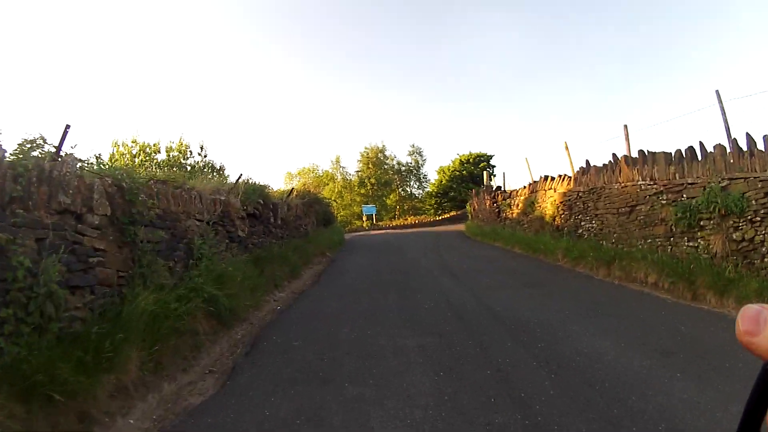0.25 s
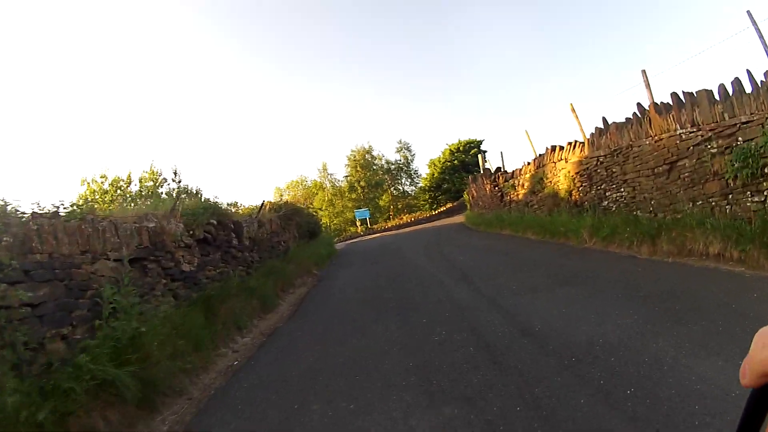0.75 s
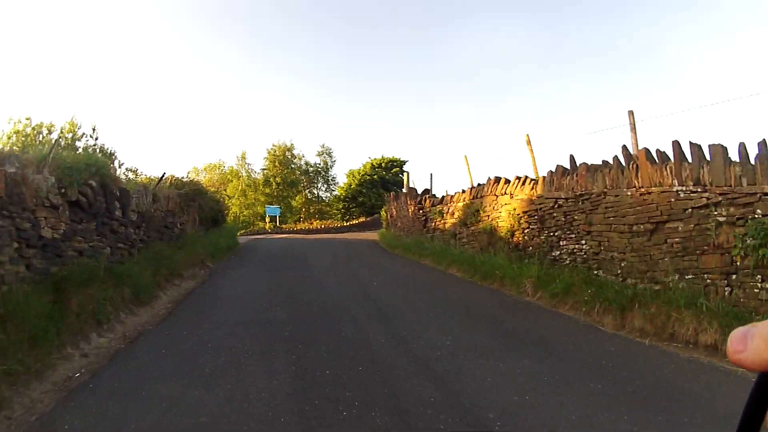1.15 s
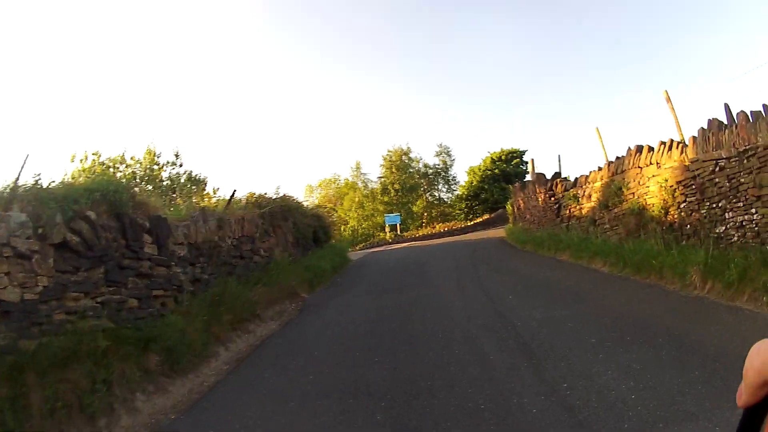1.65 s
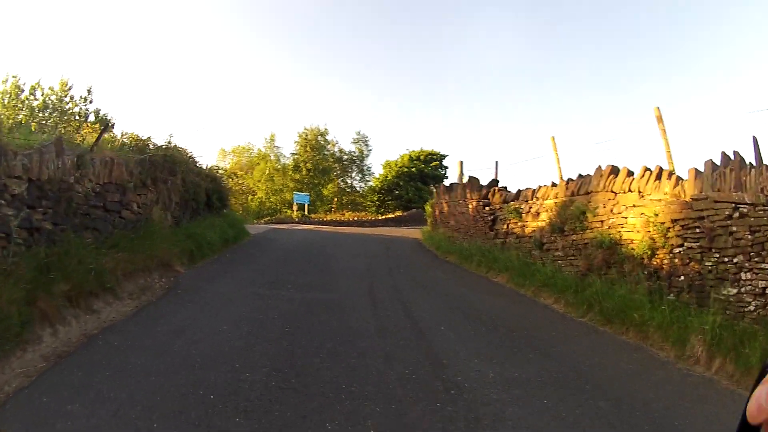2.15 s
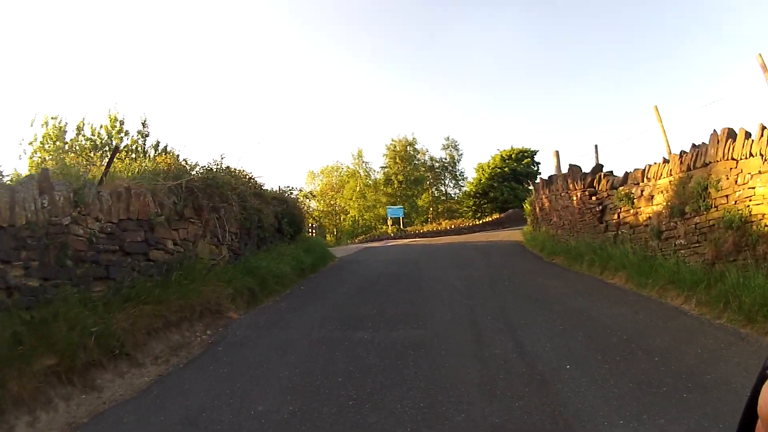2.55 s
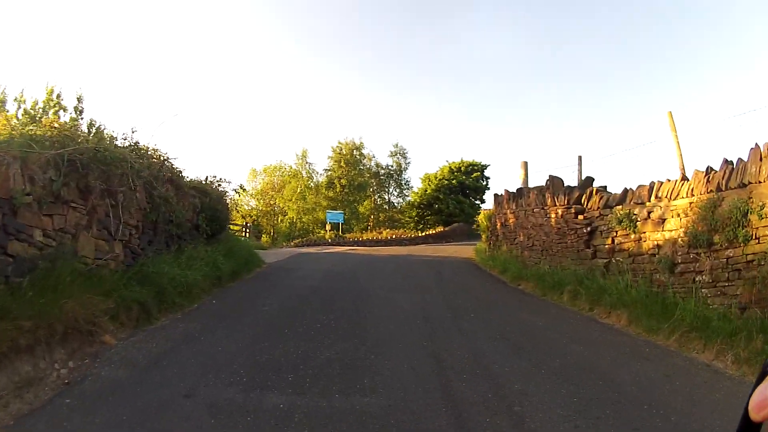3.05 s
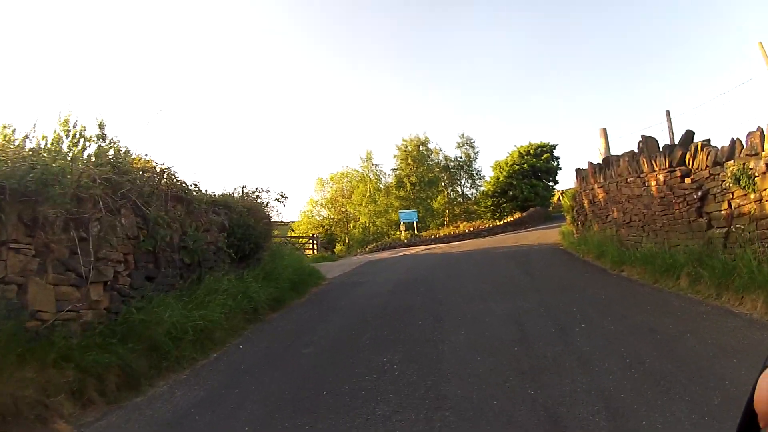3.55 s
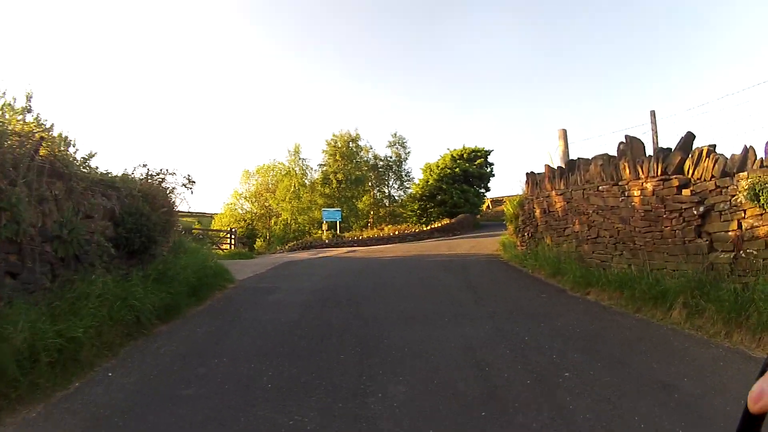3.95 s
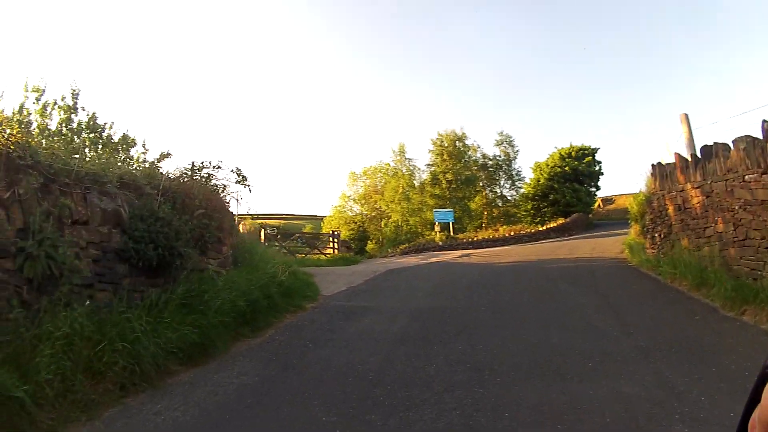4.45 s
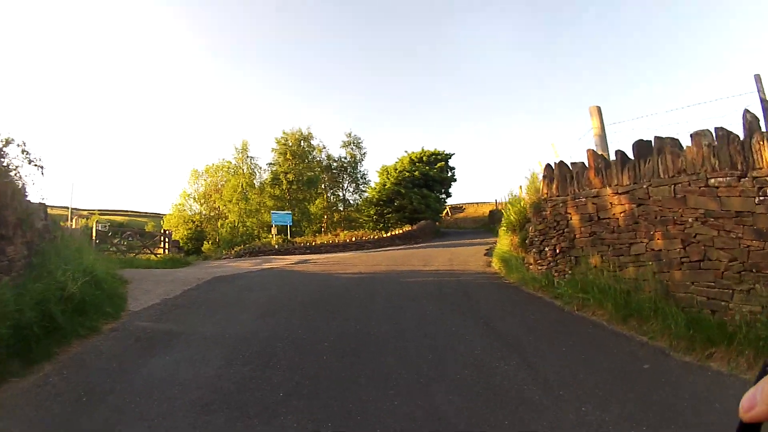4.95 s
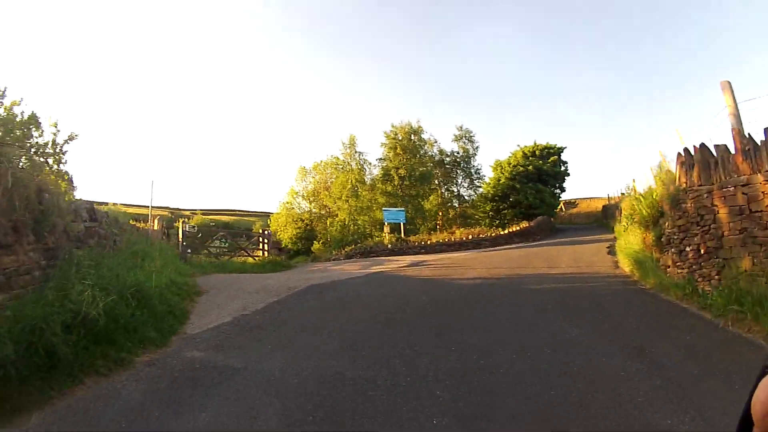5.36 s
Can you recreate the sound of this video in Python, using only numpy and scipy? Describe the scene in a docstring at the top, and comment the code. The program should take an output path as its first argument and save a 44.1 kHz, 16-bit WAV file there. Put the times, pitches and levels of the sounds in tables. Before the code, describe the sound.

Low pulsing road rumble and wind buffeting from a pedalled bicycle, heard at the handlebar, with dull thumps and small irregular rattly clicks.

```python
"""On a tarmac lane, uphill: a bicycle is pedalled, heard from a camera clamped to the handlebar.
Road grain shakes frame, bar and tread as filtered noise that surges with each pedal stroke; lumps ring the frame.
Shaped low noise is wind buffeting the camera case; random taps and single blows make the mount chatter and tick.
Grit snaps as short scraping blows; noise gripped unevenly makes the clamp creak and squeak and the brake pad
brush the rim. A faint hiss lies under it all."""
import sys
import numpy as np
from scipy import signal
from scipy.fft import rfft, irfft, next_fast_len
from scipy.io import wavfile
from scipy.ndimage import uniform_filter1d, map_coordinates

SR = 44100
rng = np.random.default_rng(int(sys.argv[2]) if len(sys.argv) > 2 else 0)


def master(y):
    """Save y as 16-bit WAV."""
    cut = np.clip(np.atleast_2d(y).T, -1, 1)
    pcm = np.round(cut * 32767)  # scale
    wavfile.write(sys.argv[1], SR, pcm.astype(np.int16))


N = 246519

# In every table of modes f is the rest pitch, width that of one resonance pass, level the relative strength.
# modes of frame and fork, the two deep ones first: (f/Hz, width/Hz, level/dB)
FRAME_MODES = [(147.2, 56, -1.5), (178.5, 33, 0.7), (235.2, 48, 0.4), (274.9, 30.3, -1.3),
               (342.7, 50.7, -1.5), (437, 148, -15), (533.6, 54, -16)]
# modes of the handlebar: (f/Hz, width/Hz, level/dB)
BAR_MODES = [(103.1, 20.5, 2), (83, 22, -10.5)]
# modes of the camera case, right at the microphone: (f/Hz, width/Hz, level/dB)
CASE_MODES = [(1640, 800, -17.5), (2573, 347, -3), (2877, 216, 3.5), (3088, 564, -4.5), (3537, 310, -13),
              (4218, 380, -16), (5400, 1700, -26)]
# modes of the mount's dull knock: (f/Hz, width/Hz, level/dB)
MOUNT_MODES = [(960, 340, 7), (1540, 880, -3), (2004, 235, 0)]


def amp(db):
    """Decibels to gain."""
    return 10 ** (np.asarray(db) / 20)


def unit(x):
    """Scale to rms 1."""
    return x / np.sqrt(np.mean(x ** 2) + 1e-20)


def wobble(rate):
    """A smooth random curve, rate knots a second."""
    knots = rng.standard_normal(int(N * rate / SR) + 4)
    return map_coordinates(knots, [np.arange(N) * rate / SR])


def filtered(x, response):
    """x times a complex response of frequency."""
    m = next_fast_len(len(x) + SR // 10)
    return irfft(rfft(x, m) * response(np.fft.rfftfreq(m, 1 / SR)), m)[:len(x)]


def coloured(spectrum):
    """Noise of rms 1 shaped by (f/Hz, level/dB) rows."""
    hz, db = np.transpose(spectrum)
    shape = lambda f: amp(np.interp(np.log(f + 1), np.log(hz), db))
    return unit(filtered(rng.standard_normal(N), shape))


def resonance(f, hz, width, order=2):
    """A resonance applied order times: soft onset, steep skirts."""
    return (1j * f * width / (hz * hz - f * f + 1j * f * width)) ** order


def ring(force, modes, spot_db=0.0, order=3):
    """Every contact lands on a new spot, so it drives each mode with a new strength and sign."""
    total = 0
    for hz, width, db in modes:
        sign = rng.choice([-1, 1], len(force))
        spot = sign * amp(spot_db * rng.standard_normal(len(force)))
        total = total + amp(db) * filtered(force * spot, lambda f: resonance(f, hz, width, order=order))
    return total


def shaken(modes, grip=1):
    """Each mode is driven by its own random force, scaled by grip; rms 1."""
    total = 0
    for hz, width, db in modes:
        force = grip * rng.standard_normal(N)
        total = total + amp(db) * filtered(force, lambda f: resonance(f, hz, width))
    return unit(total)


def restless(modes, drift, patchy_db, rate):
    """Shaken modes that each drift in pitch (a share) and strength as the load shifts, rate knots a second; rms 1."""
    total = 0
    for hz, width, db in modes:
        strength = amp(db + patchy_db * wobble(rate)) * np.sqrt(width)
        clock = np.arange(N) + np.cumsum(drift * wobble(rate))
        mode = shaken([(hz, width, db)])
        total = total + strength * map_coordinates(mode, [clock], order=1, mode="mirror")
    return unit(total)


def steadied(x, seconds):
    """Even out swells slower than the given time; rms 1."""
    power = uniform_filter1d(x ** 2, max(int(seconds * SR), 1))
    return unit(x / np.sqrt(np.abs(power) + 0.034))


def contact(modes, length, scrape, damping=1, detune=0.014, spot_db=1.0):
    """A blow and a scrape, down 60 dB after length s, ring a slightly detuned body; damping widens modes; peak 1."""
    t = np.arange(SR // 20) / SR
    force = scrape * rng.standard_normal(len(t)) * amp(-60 * t / length)
    force[0] += 1
    pitch = 1 + detune * rng.standard_normal()
    body = [(pitch * hz, damping * width, db) for hz, width, db in modes]
    sound = ring(force, body, spot_db=spot_db)
    return sound / np.abs(sound).max()


def add(track, s, sound):
    """Mix a sound into a track at time s."""
    part = track[max(round(s * SR), 0):][:len(sound)]
    part += sound[:len(part)]


def swells(rows):
    """Bell-shaped gains from (middle t/s, length/s, level/dB) rows."""
    t = np.arange(N) / SR
    return sum(amp(db) * np.exp(-(2 * (t - s) / length) ** 2) for s, length, db in rows)


def hiss():
    """The microphone's own faint hiss: steady noise that falls towards the treble."""
    # shape of the hiss: (f/Hz, relative density/dB)
    hiss_shape = [(500, 5.5), (5000, -3.5), (7500, -6.5), (12000, -7.5), (15000, -10)]
    return amp(-72.5) * coloured(hiss_shape)


def wind(rumble_gain):
    """Eddies push on the camera case, harder as it swings into each stroke and in gusts."""
    # shape of the buffeting: (f/Hz, relative density/dB)
    buffet_shape = [(10, -14), (25, -19), (40, -9.5), (55, -2.5), (70, -4.5), (100, -7), (200, -35.5),
                    (600, -70.5), (2000, -120)]
    # stronger gusts: (middle t/s, length/s, level/dB added to the buffeting)
    gust_rows = [(0.39, 0.04, -48), (1.18, 0.038, -41), (1.49, 0.07, -45), (3.11, 0.037, -38),
                 (4.05, 0.1, -40)]
    base_db, follows, lead_s = -42, 0.59, 0.019  # follows: dB gained per dB of rumble; lead_s: runs ahead
    t = np.arange(N) / SR
    swing = np.interp(t + lead_s, t, rumble_gain / rumble_gain.mean())
    gain = amp(base_db) * swing ** follows + swells(gust_rows)
    return gain * steadied(coloured(buffet_shape), seconds=0.15)


def friction(squeak_width_hz=260):
    """Surfaces that stick and let go: the clamp creaks and squeaks, the brake pad swishes on the rim."""
    # creaks of the clamp: (middle t/s, length/s, level/dB)
    creak_rows = [(0.035, 0.028, -51.5), (0.083, 0.011, -49)]
    # squeaks of the clamp: (middle t/s, length/s, level/dB, f/Hz)
    squeak_rows = [(0.301, 0.01, -54.5, 4080), (0.317, 0.047, -52, 2920), (0.329, 0.012, -64, 4240)]
    # the brake pad brushes the rim: (middle t/s, length/s, level/dB)
    rub_rows = [(0.82, 0.13, -80), (1.28, 0.21, -76.5), (3.12, 0.15, -77), (4.335, 0.038, -70.5)]
    # modes of the clamp: (f/Hz, width/Hz, level/dB)
    clamp_modes = [(3060, 790, 6), (4260, 420, 1), (5260, 1600, -13.5)]
    # mode of the rim: (f/Hz, width/Hz, level/dB)
    rim_modes = [(5380, 1300, 0)]
    slips = amp(2.3 * wobble(400))
    creaks = swells(creak_rows) * steadied(shaken(clamp_modes, grip=slips), seconds=0.047)
    squeaks = 0
    for *row, hz in squeak_rows:
        tone = steadied(shaken([(hz, squeak_width_hz, 0)], grip=slips), seconds=0.025)
        squeaks = squeaks + swells([row]) * tone
    swishes = swells(rub_rows) * shaken(rim_modes, grip=slips)
    return creaks + squeaks + swishes


def grit():
    """Small stones flung by the tyre snap and scrape against the bicycle; each also jolts the case."""
    # stones: (t/s, snap peak level/dB, scrape length/s, case ring peak level/dB, damping: factor on snap widths)
    stone_rows = [(0.349, -52, .004, -43, 1.6), (1.1713, -29.5, 0.001, -51, 0.98),
                  (3.8403, -49, 0.0058, -41, 1.6), (4.081, -52, 0.006, -47, 2),
                  (4.386, -46, 0.0065, -47, 2.1)]
    # modes that a stone rings: (f/Hz, width/Hz, level/dB)
    snap_modes = [(1390, 740, -1), (2280, 1400, 5), (2780, 1300, 7.5), (4300, 1000, -8), (5160, 1200, 7.5),
                  (6200, 800, -8), (8350, 3000, -17)]
    track = np.zeros(N)
    for s, db, length, jolt_db, damping in stone_rows:
        snap = contact(snap_modes, length, scrape=0.19, damping=damping, detune=0.004, spot_db=2.0)
        add(track, s, amp(db) * snap)
        add(track, s, amp(jolt_db) * contact(CASE_MODES, length, scrape=0.42))
    return track


def ticks(ring_db=2.5, focus_hz=2850, focus_width_hz=1900, focus_scatter=0.05):
    """Harder jolts knock the mount against its clamp: a case ring of varying pitch over a duller knock."""
    # knocks: (t/s, case ring level/dB before ring_db and the focus filter, dull knock peak level/dB)
    tick_rows = [(0.2207, -53, -45), (0.443, -40, -57), (0.4637, -43, -54), (0.499, -42.5, -44),
                 (0.704, -45.5, -44), (0.7247, -38, -56), (0.754, -41, -53), (0.849, -56, -39),
                 (0.9772, -41.5, -43), (1.048, -47.5, -51), (1.1, -47.5, -51), (1.121, -62, -43.5),
                 (1.18, -55, -57), (1.233, -47, -54), (1.295, -48.5, -48), (1.359, -48, -50),
                 (1.379, -41, -52), (1.389, -43.5, -56), (1.395, -37.5, -52), (1.562, -46, -49),
                 (1.6221, -41, -41.5), (1.673, -48, -48), (1.8795, -45.5, -42), (1.905, -45, -54),
                 (1.9182, -45, -45), (1.927, -42, -50), (2.1, -46, -63), (2.277, -47, -52),
                 (2.322, -48.5, -45), (2.5366, -43, -48), (2.5937, -42.5, -43), (2.622, -44.5, -53),
                 (2.87, -47.5, -46), (2.937, -46, -44.5), (3.0485, -44.5, -47), (3.238, -44.5, -55),
                 (3.4613, -49, -45), (3.479, -37.5, -45), (3.4856, -46.5, -46), (3.553, -41, -62),
                 (3.592, -45.5, -62), (3.788, -43, -44), (3.9125, -46, -47.5), (4.0055, -39, -44),
                 (4.028, -47, -54), (4.202, -46, -44), (4.2217, -46.5, -48), (4.274, -47, -49),
                 (4.385, -45, -59), (4.46, -54, -45), (4.486, -42, -45), (4.527, -44, -59),
                 (4.557, -48, -47), (4.641, -48, -55), (4.697, -45.5, -55), (4.82, -47, -54),
                 (5.271, -43.5, -54), (5.4988, -44, -52), (5.568, -54, -51)]
    track = np.zeros(N)
    for s, db, dull_db in tick_rows:
        hz = focus_hz * (1 + focus_scatter * rng.standard_normal())
        blow = contact(CASE_MODES, length=0.0071, scrape=0.13)
        tick = filtered(blow, lambda f: resonance(f, hz, focus_width_hz, order=1))
        add(track, s, amp(db + ring_db) * tick)
        add(track, s, amp(dull_db) * contact(MOUNT_MODES, length=0.01, scrape=0.062))
    return track


def chatter(tread_gain, rate=420, spread_db=1.0, clump_db=1.0, drift=0.0081):
    """Tiny uneven contacts, rate a second, ring the case and knock the mount, stronger with each stroke."""
    # the case's rattle over time: (t/s, level/dB before a 4 dB cut and the swing of the strokes)
    rattle_curve = [(0, -55), (0.599, -58.5), (0.8, -55), (1.3, -55.5), (2.4, -56), (2.75, -55.5),
                    (3.35, -58), (3.65, -55.5), (3.92, -57), (4.15, -56), (4.6, -55), (5.0, -57),
                    (5.59, -56)]
    follows, mount_db = 0.32, -8  # case: dB gained per dB of tread gain; mount: dB relative to tread gain
    rattle_db = np.interp(np.arange(N) / SR, *np.transpose(rattle_curve))
    tap_db = spread_db * rng.standard_normal(N) + clump_db * wobble(45)
    taps = (rng.random(N) < rate / SR) * amp(np.clip(tap_db, None, 7.5))
    # the case's pitch wanders as the clamp shifts
    clock = np.arange(N) + np.cumsum(drift * np.diff(wobble(35), prepend=0)) * SR / 35
    case = map_coordinates(ring(taps, CASE_MODES, spot_db=2.0), [clock], mode="mirror")
    case = steadied(case, seconds=0.08)
    mount = steadied(ring(taps, MOUNT_MODES, spot_db=2.5), seconds=0.07)
    swing = tread_gain / tread_gain.mean()
    return amp(rattle_db - 4.0) * swing ** follows * case + amp(mount_db) * tread_gain * mount


def bumps(focus=0.24):
    """Lumps in the road thump frame and bar; the sharper the edge, the higher the modes it reaches."""
    # lumps: (t/s, peak level/dB, f/Hz the thump centres on)
    lump_rows = [(0.061, -36, 524), (0.214, -28.5, 105), (0.281, -33, 353), (0.437, -25.5, 164.7),
                 (0.533, -40, 514), (0.696, -36, 460), (0.825, -23, 110), (0.862, -26.5, 332),
                 (1.030, -27, 248), (1.268, -31, 151), (1.331, -36.5, 168), (1.469, -24.5, 269),
                 (1.537, -42, 495), (2.396, -29, 247), (2.593, -36, 483), (2.663, -27.5, 230),
                 (2.695, -25, 192), (3.038, -35.5, 199), (3.558, -28.5, 110.7), (3.668, -27, 343),
                 (4.105, -23.5, 170), (4.137, -39, 233), (4.547, -32, 223), (5.503, -31.5, 232),
                 (5.557, -33.5, 480)]
    track, blow = np.zeros(N), signal.unit_impulse(SR // 6)
    for s, db, hz in lump_rows:
        body = ring(blow, BAR_MODES + FRAME_MODES, order=1)
        thump = filtered(body, lambda f: resonance(f, hz, focus * hz))
        add(track, s, amp(db) * thump / np.abs(thump).max())
    return track


def pedalling():
    """Each stroke swells rumble, tread noise and hum above their coasting levels; three gains over time."""
    # strokes: (middle t/s, length/s, then the swell of each gain: rumble level/dB, tread level/dB, hum level/dB);
    # middle and length are the rumble's
    stroke_rows = [(-0.05, 0.27, -44.5, -52, -36.5), (0.401, 0.21, -34, -54, -35),
                   (0.857, 0.24, -33.5, -56, -39), (1.323, 0.25, -32.5, -55.5, -35.5),
                   (1.77, 0.3, -35, -58, -37.5), (2.242, 0.24, -35.5, -58, -37),
                   (2.728, 0.31, -36.5, -58.5, -34.5), (3.19, 0.19, -34.5, -55.5, -33),
                   (3.674, 0.28, -37, -59.5, -40.5), (4.145, 0.2, -35, -56, -35.5),
                   (4.648, 0.4, -37, -58, -40), (5.145, 0.24, -35.5, -56.5, -38),
                   (5.62, 0.28, -37.5, -56, -34)]
    coast_rumble_db, coast_tread_db, coast_hum_db = -41.5, -64, -50  # as the cranks pass dead centre
    tread_spread, hum_spread, tread_lead_s = 1.12, 1.57, 0.021  # spreads in stroke lengths; the tread is early
    s, length, rumble_db, tread_db, hum_db = np.transpose(stroke_rows)
    rumble = amp(coast_rumble_db) + swells(zip(s, length, rumble_db))
    tread = amp(coast_tread_db) + swells(zip(s - tread_lead_s, tread_spread * length, tread_db))
    hum = amp(coast_hum_db) + swells(zip(s, hum_spread * length, hum_db))
    return rumble, tread, hum


def rolling(rumble_gain, tread_gain, hum_gain, deep_db=-5, upper_db=-2, count=2):
    """Every stroke presses the tyre harder on the road grain, shaking frame, bar and tread; count modes are deep."""
    # modes of the tread on tarmac: (f/Hz, width/Hz, level/dB)
    tread_modes = [(684, 270, -4), (813, 134, 0.5), (966, 80, 3.5), (1078, 135, -2.5), (1525, 670, -11),
                   (2010, 90, -12)]
    # the tread whirrs on a ribbed patch: (middle t/s, length/s, level/dB)
    whirr_rows = [(0.34, 0.12, -51.5)]
    # modes of the whirr: (f/Hz, width/Hz, level/dB)
    whirr_modes = [(800, 22, 9), (978, 62, 3), (1030, 45, 1)]
    deep_follows, upper_follows = 1.26, 0.73  # dB gained per dB of rumble
    patches = wobble(70)  # uneven patches of tarmac, felt by tread and frame alike
    swing = rumble_gain / rumble_gain.mean()

    deep = steadied(shaken(FRAME_MODES[:count]) * amp(2.8 * patches), seconds=0.13)
    deep = amp(deep_db) * swing ** deep_follows * deep
    upper = restless(FRAME_MODES[count:], drift=0.018, patchy_db=1.3, rate=11)
    upper = steadied(upper * amp(0.59 * patches), seconds=0.1)
    upper = amp(upper_db) * swing ** upper_follows * upper
    frame = rumble_gain.mean() * (deep + upper)

    bar = hum_gain * steadied(restless(BAR_MODES, drift=0.035, patchy_db=1.5, rate=7), seconds=0.18)
    grain = amp(0.82 * patches + 0.55 * wobble(220))
    tread = unit(restless(tread_modes, drift=0.008, patchy_db=2.0, rate=18) * grain)
    tread = amp(-0.83) * tread_gain * tread
    whirr = swells(whirr_rows) * steadied(shaken(whirr_modes), seconds=0.074)
    return frame + bar + tread + whirr


def scene():
    """The pedalling drives rolling, wind and chatter; everything reaches one microphone, over its faint hiss."""
    rumble, tread, hum = pedalling()
    background = hiss() + wind(rumble) + friction()
    knocks = grit() + ticks() + chatter(tread)
    road = bumps() + rolling(rumble, tread, hum)
    return (background + knocks + road)[None]


def record(dry):
    """The excerpt's edges are faded for an instant so the cuts do not click; nothing passes above top_hz."""
    top_hz = 15250
    edges = signal.windows.tukey(N, .002)
    return np.array([filtered(channel * edges, lambda f: f < top_hz) for channel in dry])


dry = scene()
out = record(dry)
master(out)
```